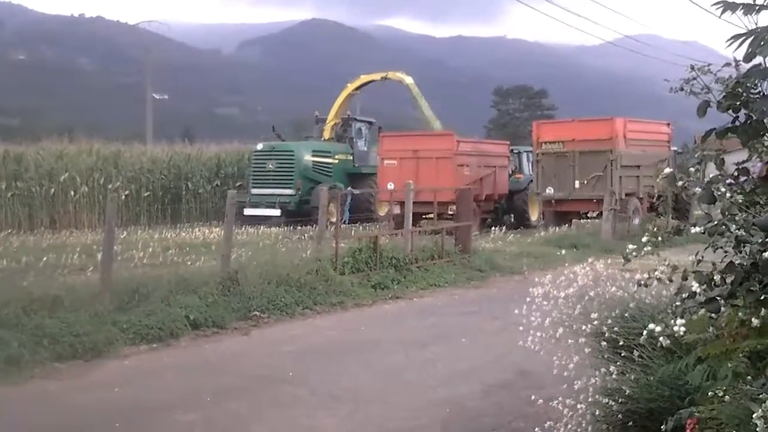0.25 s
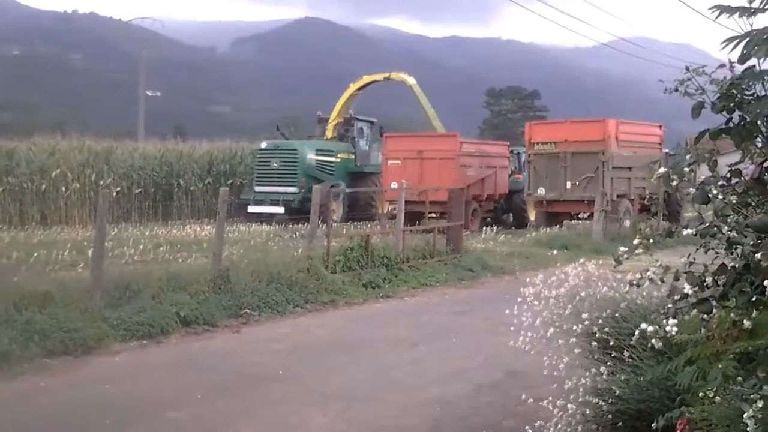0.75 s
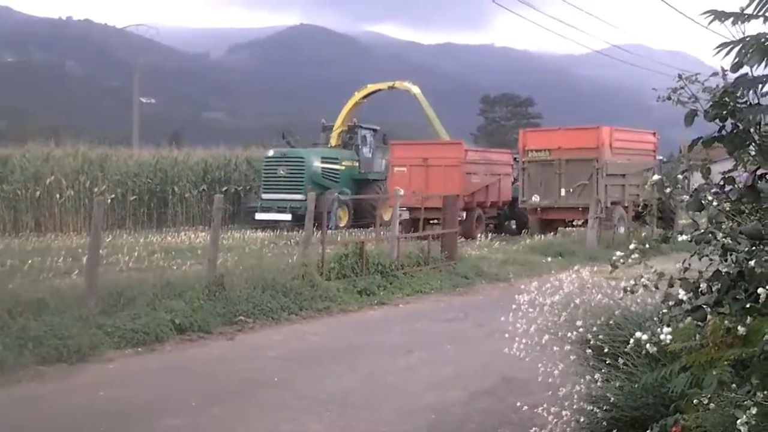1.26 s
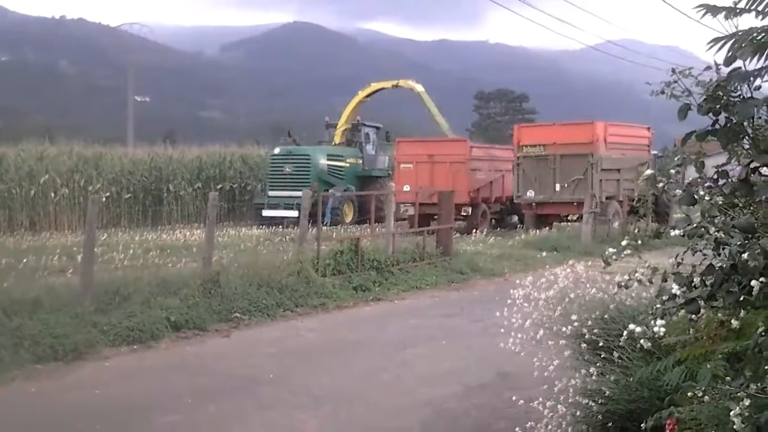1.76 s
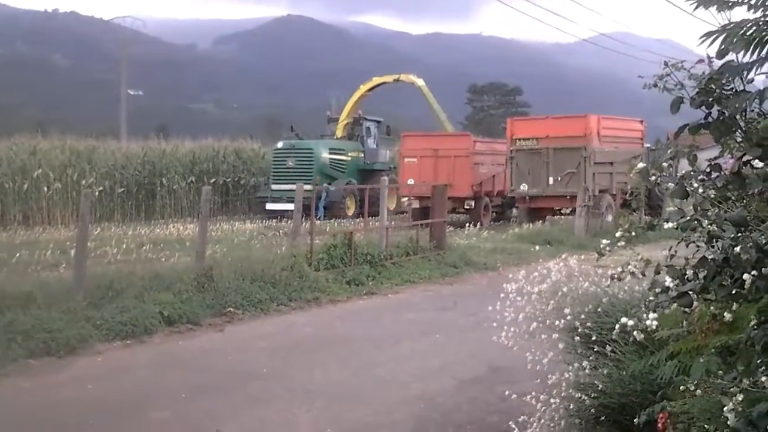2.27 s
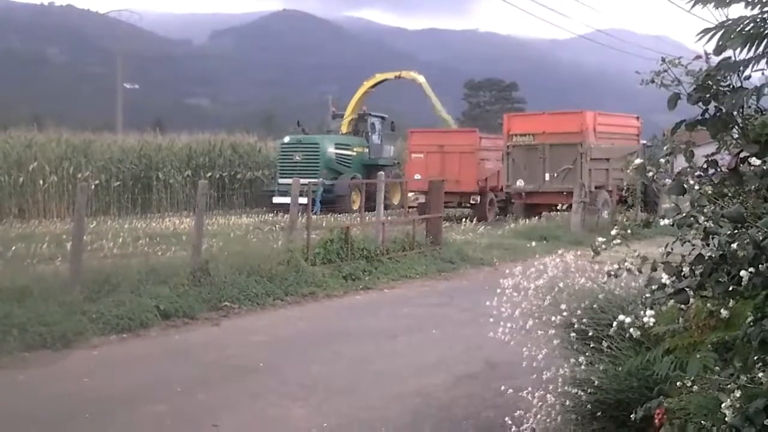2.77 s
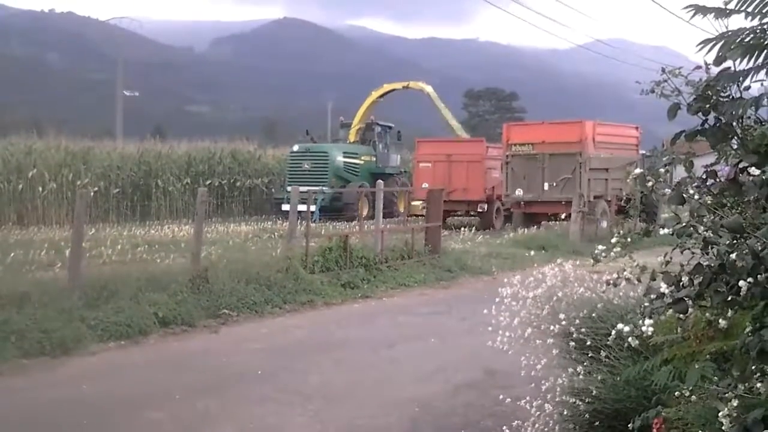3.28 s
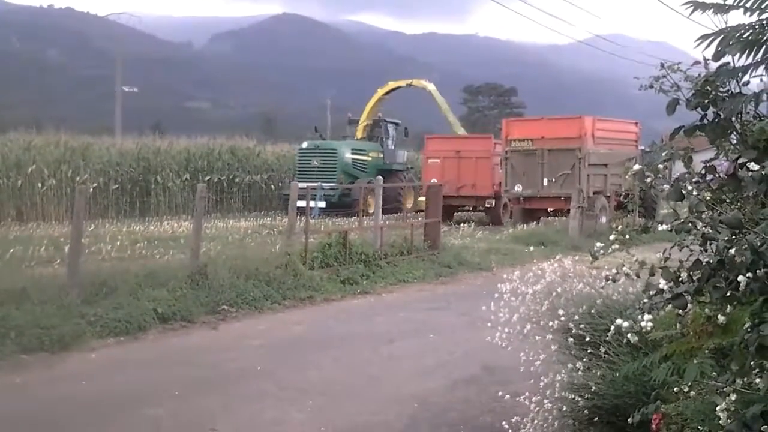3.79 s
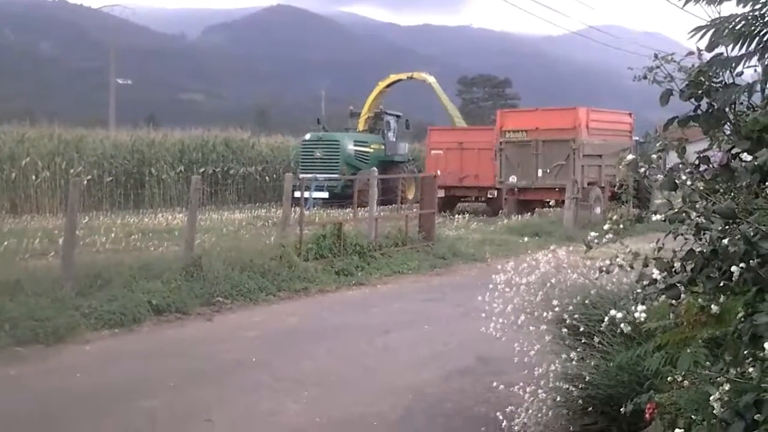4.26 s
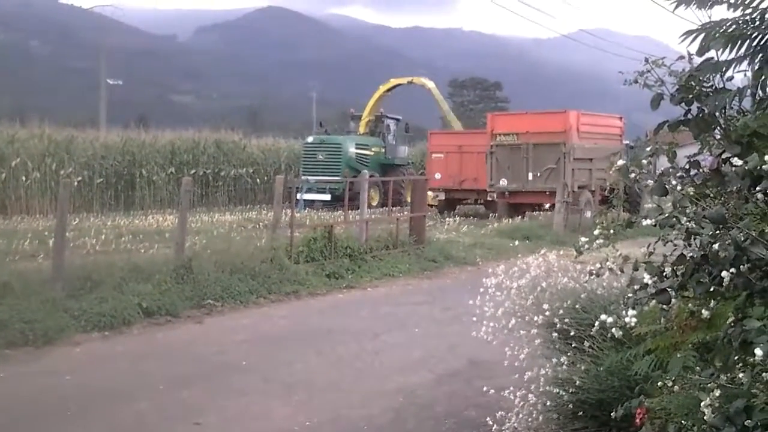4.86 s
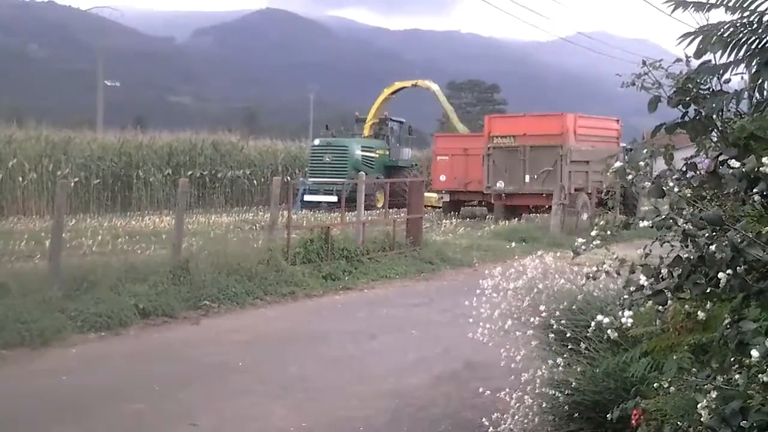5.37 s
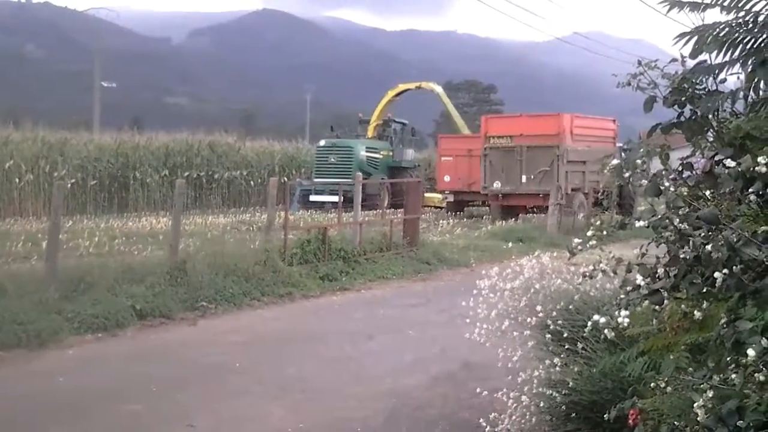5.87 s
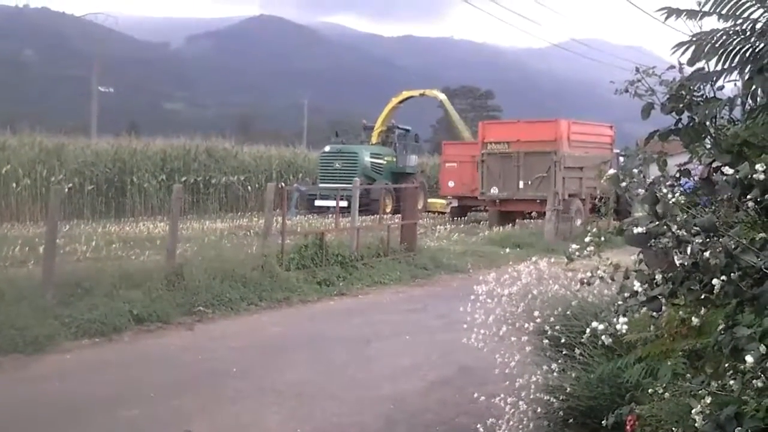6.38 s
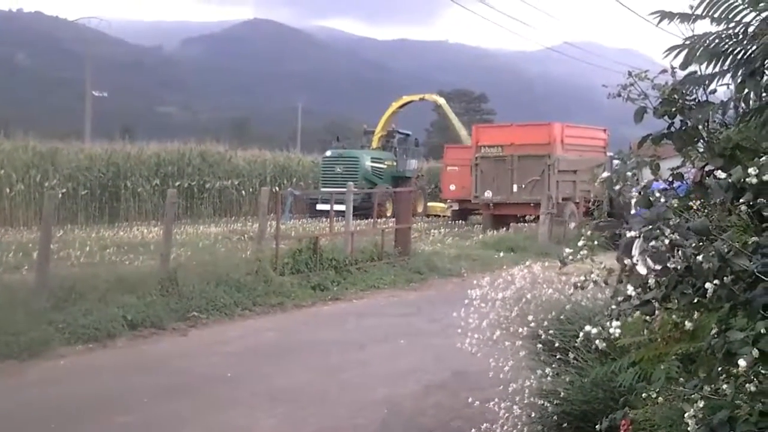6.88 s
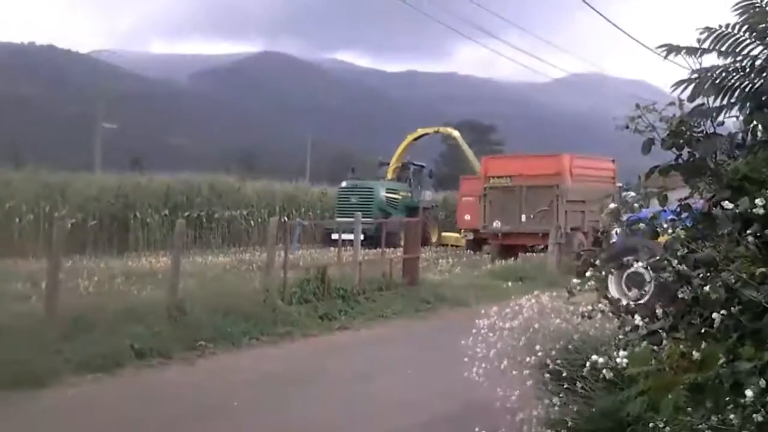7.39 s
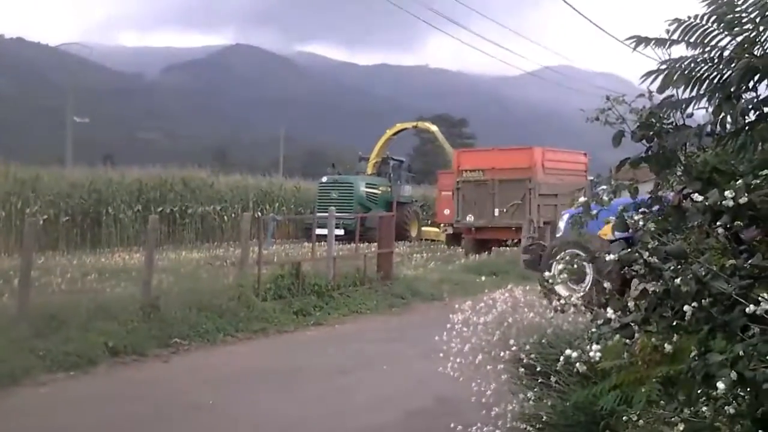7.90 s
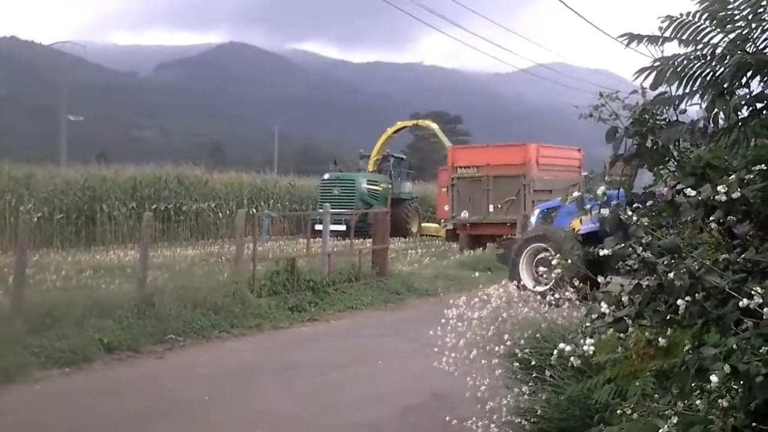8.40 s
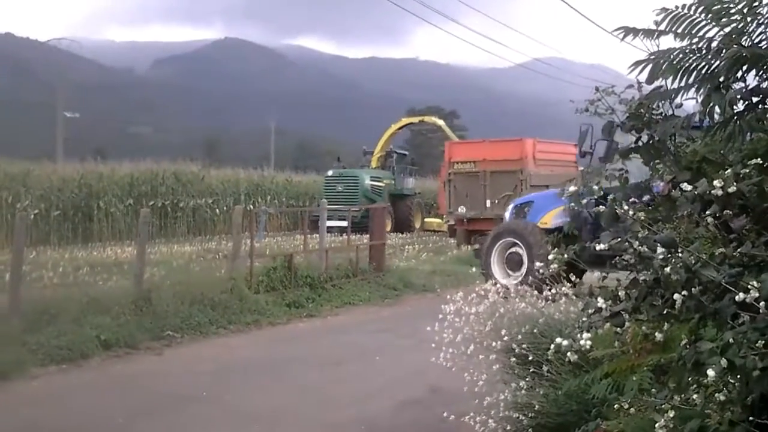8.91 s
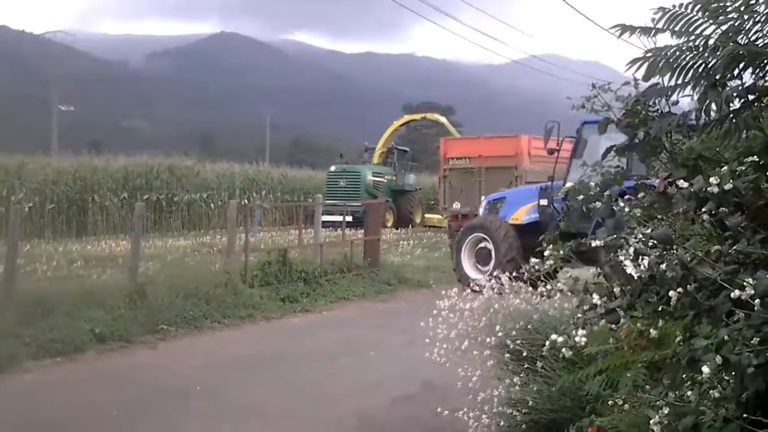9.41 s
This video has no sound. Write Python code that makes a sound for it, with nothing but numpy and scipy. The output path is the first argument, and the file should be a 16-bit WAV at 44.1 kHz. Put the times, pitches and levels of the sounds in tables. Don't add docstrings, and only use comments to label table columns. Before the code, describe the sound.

A big harvesting machine works steadily outdoors, already at full speed at the start. Its whining drum pitch wavers slightly with engine speed, over a nasal engine drone and harsh chopping noise. Crop spray surges softly up the spout, then a stone ticks once. The sound gradually dulls and weakens as the machine moves away, still running at the end, on a small, nearly mono microphone.

```python
import sys
import numpy as np
from scipy import signal
from scipy.fft import rfft, irfft, next_fast_len
from scipy.io import wavfile
from scipy.ndimage import uniform_filter1d, map_coordinates

SR = 44100
rng = np.random.default_rng(int(sys.argv[2]) if len(sys.argv) > 2 else 0)


def rack_gain(trim_db):
    fader = np.asarray(trim_db, float)
    return 10 ** (fader / 20)


def store_pcm(level_fs):
    pcm = np.round(np.clip(level_fs, -1, 1) * 32767).astype(np.int16)
    wavfile.write(sys.argv[1], SR, np.atleast_2d(pcm).T)


N = 425565


def unit(x):
    return x / np.sqrt(np.mean(x ** 2) + 1e-20)


def curves(rows):
    s, *cols = np.transpose(rows)
    return [np.interp(np.arange(N) / SR, s, c) for c in cols]


def wobble(rate):
    at = np.arange(0, N + 64, 64)
    knots = rng.standard_normal(int(N * rate / SR) + 4)
    return np.interp(np.arange(N), at, map_coordinates(knots, [at * rate / SR]))


def humps(rows):
    s, half, *cols = np.transpose(rows)
    at = np.arange(0, N + 256, 256)
    bells = np.exp(-((at[:, None] / SR - s) / half) ** 2)
    return [np.interp(np.arange(N), at, bells @ c) for c in cols]


def faded(clear_db, fades):
    return clear_db - humps(fades)[0]


def receding(ratio):
    return (ratio > 16) * np.linspace(2, -3, N)


def filtered(x, response):
    m = next_fast_len(N + 8192)
    return irfft(rfft(x, m) * response(np.fft.rfftfreq(m, 1 / SR)), m)[:N]


def rush(spectrum, gate, patchy_db):
    z = signal.stft(gate * rng.standard_normal(N), nperseg=256)[2]
    field = uniform_filter1d(rng.standard_normal(z.shape), size=3, axis=0)
    field = uniform_filter1d(field, size=24, axis=1)
    x = signal.istft(z * rack_gain(patchy_db * unit(field)), nperseg=256)[1][:N]
    f, *colours = np.transpose(spectrum)

    def coloured(db):
        return unit(filtered(x, lambda hz: rack_gain(np.interp(np.log(hz + 1), np.log(f), db))))

    first, last = coloured(colours[0]), coloured(colours[-1])
    return first + np.arange(N) / N * (last - first)


def tone(turns, db, drift):
    return np.sqrt(2) * rack_gain(db) * np.sin(2 * np.pi * (turns + rng.random()) + drift * wobble(6))


# (t/s, crank turns a second)
ENGINE_SPEED = [(0, 36.16), (.3, 36.05), (1.1, 35.12), (1.5, 35.4), (1.9, 35.25), (2.63, 36.1),
                (3.25, 35.35), (4.1, 35.5), (4.62, 35.58), (5.05, 36.35), (5.65, 34.8), (6.25, 36.0),
                (6.65, 35.3), (7.3, 35.25), (7.64, 35.98), (7.9, 35.8), (8.85, 36.28), (9.65, 36.45)]


def crank_turns():
    return np.cumsum(curves(ENGINE_SPEED)[0]) / SR


def firing(crank, depth, bank):
    return 1 + depth * np.cos(2 * np.pi * 3 * crank) + bank * np.cos(np.pi * 3 * crank)


# (t/s, level/dB)
CROP_FEED = [(0.0, -21.5), (0.02, -19.5), (1.34, -20.5), (1.61, -19), (1.8, -21), (2.25, -19), (3.14, -21),
             (3.79, -19), (4.0, -21.5), (4.16, -21), (4.38, -22), (5.43, -21), (5.45, -22), (6.15, -22),
             (6.18, -23.5), (6.74, -22), (7.55, -23), (9.65, -24.5)]
LAYER_FOLLOWS = {"roar": (-21, 0.49), "rattle": (-24, 0.8), "chop": (-21.5, 0.98), "hiss": (-37, .95),
                 "spray": (-49, -.1)}


def fed(layer):
    feed_db, = curves(CROP_FEED)
    mean_db, share = LAYER_FOLLOWS[layer]
    return mean_db + share * (feed_db - feed_db.mean())


# (crank order, level/dB)
ORDER_LEVELS = [(3, -57), (4, -47), (4.5, -54), (5, -52), (6, -28), (8, -31), (8.5, -43), (9, -25),
                (9.5, -38), (10, -29), (10.5, -34), (11, -30), (12, -40), (18, -53), (19, -44), (20, -44),
                (21, -34), (22, -34), (22.5, -38), (23, -41), (23.5, -39), (24, -46), (25, -44),
                (25.5, -45)]
# (t/s, level/dB)
ORDER_12_UNSHADED = [(0, -43), (7.65, -39), (7.9, -28.5), (8.75, -42), (9.05, -28.5), (9.65, -29.5)]
ORDER_FADES = {"order 6": (-25.5, [(.2, 0.46, 6), (1.52, 0.083, 2), (2.65, 0.37, 7), (3.6, 0.23, 2),
               (4.4, 0.34, 5), (5.25, 0.21, 5), (6.5, 0.44, 2.5), (8.1, 0.5, 11.5), (9, .6, 4)]),
               "order 9": (-24.5, [(.75, .15, 3), (1.25, .15, 4), (3.15, .25, 3), (5.1, 0.12, -1),
               (7.25, .15, 5), (7.7, 0.18, -5), (9.2, .5, 6.5)]), "order 10": (-25.5, [(.3, .5, 3),
               (1.55, .12, 4), (2.85, 0.57, 7), (4.5, 0.56, 13), (5.4, 0.37, 3), (6.3, 0.5, 9),
               (7.7, 0.56, 10), (9.65, .4, 10)]), "order 11": (-26.5, [(.7, 0.35, 13), (1.7, 0.52, 14),
               (2.9, 0.25, 7), (3.6, 0.29, 10), (5.05, 0.19, 13), (7.75, .25, 5), (8.45, 0.14, 5)])}
PANEL_AND_ROAR_FADES = {"order 21": (-31, [(0, .25, 13), (2.9, .22, 13), (5.2, 0.46, 10), (6.5, 0.36, 8),
                        (8.3, .7, 10), (9.65, 0.54, 9)]), "order 22": (-32, [(1.7, 0.4, 2.1),
                        (2.15, .08, 9.2), (2.85, 0.26, 12), (5.4, 0.51, 9.8), (6.4, 0.29, 6),
                        (7.4, .3, 4.5), (8.35, 0.37, 16), (9.1, 0.41, 9)]),
                        "order 8": (-26.5, [(.75, 0.33, 7.6), (1.95, .25, 7.7), (3.15, .3, 9),
                        (4.25, 0.13, 12), (5.5, 0.54, 8), (7.1, .45, 12), (8.1, .3, 4), (8.9, 0.37, 15)]),
                        "roar": (.5, [(.85, 0.25, 1.4), (2.47, 0.11, 1.7), (3.2, 0.16, 4.5), (3.71, 0.2, 3),
                        (4.21, 0.14, 2.2), (8.41, 0.11, 1.8), (9.65, 0.19, 3.4)])}
RATTLE_AND_ORDER_23_FADES = {"rattle": (0.45, [(3.05, 0.44, 1.6), (4.95, .12, 2), (8.3, .5, 0.73)]),
                             "order 23.5": (-33, [(.3, .7, 7), (1.85, .25, -5), (3.8, 0.55, 6), (5.5, .6, 9),
                             (7.6, 0.68, 9), (9.2, 0.63, 11)])}


def engine_hum(crank):
    fades = ORDER_FADES | PANEL_AND_ROAR_FADES | RATTLE_AND_ORDER_23_FADES
    own = {order: faded(*fades["order " + str(order)]) for order in (6, 8, 9, 10, 11, 21, 22, 23.5)}
    own[12] = curves(ORDER_12_UNSHADED)[0]
    hum = 0
    for order, db in ORDER_LEVELS:
        level_db = own[order] if order in own else db + receding(order) + 2 * wobble(3)
        hum = hum + tone(order * crank, level_db, drift=order / 60)
    return hum


# (f/Hz, level/dB per Hz)
ROAR_COLOUR = [(20, -42.5), (50, -44.5), (90, -34.5), (125, -26.5), (160, -16), (225, -10.5), (252, -7.5),
               (275, 1), (310, 1), (375, -3), (410, -7), (450, -10), (560, -18.5), (900, -120)]


def exhaust_roar():
    level_db = fed("roar") + faded(*PANEL_AND_ROAR_FADES["roar"])
    return rack_gain(level_db) * rush(ROAR_COLOUR, 1, patchy_db=2.0)


# (f/Hz, level/dB per Hz at first, level/dB per Hz at last)
RATTLE_COLOUR = [(300, -120, -120), (507, -31, -30), (586, -16.5, -12.5), (693, -9.5, -7), (747, -1.5, 1),
                 (785, -0.3, -.3), (911, -4, -4.5), (903, -10, -9.5), (1096, -11, -8), (1153, -12.5, -10),
                 (1340, -12, -6.5), (1490, -16.5, -12.5), (1695, -20, -30.5), (2200, -120, -120)]


def panel_rattle(crank):
    level_db = fed("rattle") + faded(*RATTLE_AND_ORDER_23_FADES["rattle"])
    return rack_gain(level_db) * rush(RATTLE_COLOUR, firing(crank, depth=0.14, bank=0.045), patchy_db=0.56)


def turbo_whine():
    level_db = np.linspace(-64, -69, N) + 2 * wobble(1.5)
    return tone(9890 * np.arange(N) / SR, level_db, drift=6)


KNIFE, PADDLE, GEAR = 7.6, 3.434, 28.66
# (multiple of paddle rate, level/dB)
BLOWER_LINES = [(2, -38), (3, -29), (4, -44), (5, -47), (6, -37), (8, -47)]
DRUM_AND_BLOWER_FADES = {"knife": (-17, [(.62, 0.2, 11.6), (1.52, 0.1, 10), (2.17, 0.37, 13),
                         (3.12, 0.079, 9.5), (3.6, 0.73, 7.5), (4.6, 0.39, 11), (5.4, 0.44, 3),
                         (6.15, 0.17, 11), (7.4, 0.56, 11), (8.7, 0.62, 11), (9.65, 0.35, 14)]),
                         "paddle": (-24.5, [(.1, 0.32, 5), (.85, 0.42, 16), (1.6, .25, 10), (2.3, .12, 21),
                         (3.13, 0.1, 11), (3.7, 0.45, 4.6), (4.5, .25, 7.4), (5.55, .25, 9), (6.3, .3, 4.7),
                         (7.55, 0.083, 8.7), (8.3, 0.31, 10), (9.2, .45, 16)]), "gear": (-37, [(1, .6, 7),
                         (1.75, .2, 12), (2.9, 0.12, 14), (4.5, 0.28, 6.4), (5.5, 0.38, 16), (7.3, .4, 16),
                         (8.35, .15, 12), (9.3, .5, 9)])}


def drum_and_blower(crank):
    knife_db = faded(*DRUM_AND_BLOWER_FADES["knife"])
    paddle_db = faded(*DRUM_AND_BLOWER_FADES["paddle"])
    gear_db = faded(*DRUM_AND_BLOWER_FADES["gear"]) + 1.4 * wobble(8.9)
    lines = tone(KNIFE * crank, knife_db, drift=.35)
    lines += tone(2 * KNIFE * crank, knife_db - 27, drift=.7)
    for k, db in BLOWER_LINES:
        level_db = paddle_db if k == 3 else db + receding(k * PADDLE) + 2 * wobble(4)
        lines += tone(k * PADDLE * crank, level_db, drift=0.23)
    return lines + tone(GEAR * crank, gear_db, drift=1.2)


# (f/Hz, level/dB per Hz at first, level/dB per Hz at last)
KNIFE_COLOUR = [(900, -120, -120), (1415, -18, -20), (1510, -13.5, -15.5), (1736, -6.5, -6.5),
                (1840, -11, -10), (2068, -1, -3), (2260, -12, -12.5), (2560, -2.5, -10.5),
                (2760, -0.5, -4.5), (2925, -5.5, -4), (3285, -15.5, -15.5)]
CHUTE_COLOUR = [(3490, -7, -5.5), (3880, -5.5, -19.5), (3940, -8, -14.5), (4386, 1.1, -6.5),
                (4414, 3, -2.5), (4450, -6, -3.5), (4860, -7, -19), (5070, -10, -13.5), (5450, -17, -19),
                (5900, -35.5, -37), (7000, -120, -120)]


def chopping(crank):
    gate = firing(crank, depth=0.13, bank=0.084)
    return rack_gain(fed("chop")) * rush(KNIFE_COLOUR + CHUTE_COLOUR, gate, patchy_db=0.78)


# (f/Hz, level/dB per Hz at first, level/dB per Hz at last)
HISS_COLOUR = [(4500, -120, -120), (5240, -5.5, -10), (5600, -3, -2.5), (5800, 0, -6.5), (6270, 3, -2.2),
               (6620, -6.5, -10.5), (6780, 1, -5), (7320, -8, -10), (7470, -4.5, -13), (8080, -11.5, -8.5),
               (8500, -23.5, -15), (9500, -120, -120)]


def crop_hiss(crank):
    return rack_gain(fed("hiss")) * rush(HISS_COLOUR, firing(crank, depth=0.15, bank=0.097), patchy_db=0.9)


# (f/Hz, level/dB per Hz at first, level/dB per Hz at last)
SPRAY_COLOUR = [(7650, -120, -120), (8060, -8, -4.5), (8180, -4.5, -2.5), (8870, 0, 0.2), (9420, -4, -1.5),
                (9780, 1, -1), (10370, -2, -3.5), (10580, -14.5, -8.5), (11500, -120, -120)]
# (t/s, half length/s, spray gain/dB, chaff gain/dB)
CROP_SURGES = [(2.2, .14, 0.5, 9), (2.66, 0.25, 3, 13), (3.3, .15, 2, .1), (3.75, .25, 3, 5),
               (4.7, .2, .5, 5), (5.07, .1, 1.5, 5), (5.17, 0.32, 5, 8.5), (5.7, .25, 1.5, 2),
               (7.4, .6, 2, 1), (8.2, 0.27, 0.5, 2), (8.85, .2, 3.5, .1), (9.45, 0.24, 3.5, .1)]


def crop_spray(crank):
    level_db = fed("spray") + humps(CROP_SURGES)[0]
    return rack_gain(level_db) * rush(SPRAY_COLOUR, firing(crank, depth=0.097, bank=0.054), patchy_db=2.0)


# (f/Hz, level/dB per Hz)
CHAFF_COLOUR = [(9800, -120), (10500, -3), (11500, 0), (12500, -1), (13300, -4), (13600, -120)]


def dry_chaff():
    level_db = -62.5 + humps(CROP_SURGES)[1]
    return rack_gain(level_db) * rush(CHAFF_COLOUR, 1, patchy_db=6.0)


# (t/s, peak level/dB)
STONE_TICKS = [
    (5.579, -18.5),
]


def stone_ticks():
    out, t = np.zeros(N), np.arange(300) / SR
    for s, db in STONE_TICKS:
        ring = 0
        for hz, share in ((9800, 1), (8500, .35), (11300, .1), (3950, 3.6)):
            ring = ring + share * np.sin(2 * np.pi * hz * t)
        crack = .12 * np.diff(rng.standard_normal(len(t) + 1))
        swell = (t / .0007 * np.exp(1 - t / .0007)) ** 2
        out[round(s * SR) - 30:][:len(t)] += rack_gain(db - 1.5) * swell * (ring + crack)
    return out


def scene():
    crank = crank_turns()
    engine = engine_hum(crank) + exhaust_roar() + panel_rattle(crank) + turbo_whine()
    crop = chopping(crank) + crop_hiss(crank) + crop_spray(crank) + dry_chaff()
    mono = engine + drum_and_blower(crank) + crop + stone_ticks()
    return np.array([mono, mono])


FRAME, GRID = 1024, 952
# (f/Hz, step level/dB)
TREBLE_STEP = [(6000, -50), (6800, -36), (7400, -29), (8200, -27.5), (10500, -27.5), (13500, -28)]


def coarse_treble(x):
    burst = uniform_filter1d(filtered(x, lambda hz: (hz > 8500) & (hz < 13400)) ** 2, size=88)
    is_burst = 1. * (burst > 40 * np.median(burst))
    attack = np.clip(2 * uniform_filter1d(is_burst, size=176), 0, 1)
    n, k = np.arange(2 * FRAME)[:, None], np.arange(280, 640)
    window = np.sin(np.pi * (n + .5) / 2 / FRAME) * np.sqrt(2 / FRAME)
    basis = window * np.cos(np.pi / FRAME * (n + .5 + FRAME / 2) * (k + .5))
    lead = 2 * FRAME - GRID
    padded = np.pad(x * (1 - attack), (lead, 2 * FRAME - (N - GRID) % FRAME), "reflect")
    blocks = padded.reshape(-1, FRAME)
    lines = np.hstack([blocks[:-1], blocks[1:]]) @ basis
    hz, step_db = np.transpose(TREBLE_STEP)
    step = rack_gain(np.interp((k + .5) * SR / 2 / FRAME, hz, step_db))
    rounded = np.sign(lines) * step * np.floor(np.abs(lines) / step + .4)
    error = (rounded - lines) @ basis.T
    blocks[:-1] += error[:, :FRAME]
    blocks[1:] += error[:, FRAME:]
    return blocks.ravel()[lead:][:N] + x * attack


def low_pass(x):
    return signal.sosfilt(signal.butter(12, 13420, fs=SR, output="sos"), x)


# (t/s, low f/Hz, high f/Hz, share)
SIDE_SLIPS = [
    (.292, 5170, 7000, 0.56),
    (3.636, 4130, 5800, 0.69),
    (5.935, 4130, 5300, .6),
    (8.628, 4130, 5300, .6),
]


def record(dry):
    overloaded = dry[0] / (1 + np.abs(dry[0] / 1.15) ** 6) ** (1 / 6)
    mono = coarse_treble(overloaded)
    t, side = np.arange(N) / SR, 0
    late = np.roll(mono, 4 * FRAME)
    for s, low_hz, high_hz, share in SIDE_SLIPS:
        frame = np.cos(np.pi * np.clip((t - s) * SR / 2 / FRAME, -.5, .5)) ** 2
        band = filtered(late, lambda hz: (hz > low_hz) & (hz < high_hz))
        side = side + 1.2 * share * frame * band
    return low_pass(mono + np.array([side, -side]))


dry = scene()
out = record(dry)
store_pcm(out)
```